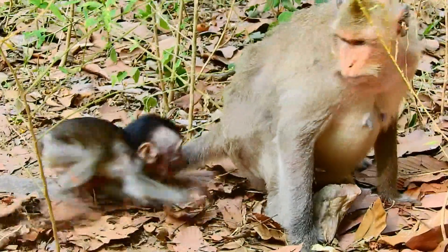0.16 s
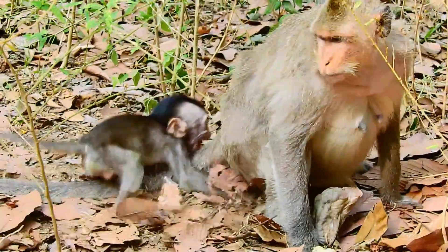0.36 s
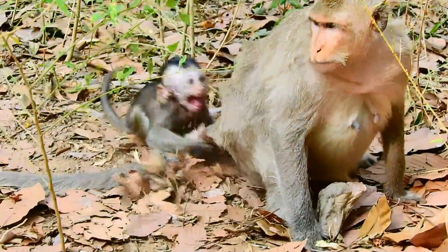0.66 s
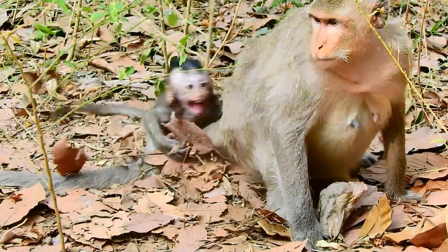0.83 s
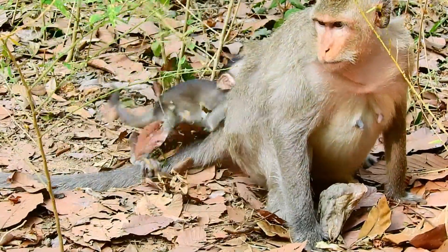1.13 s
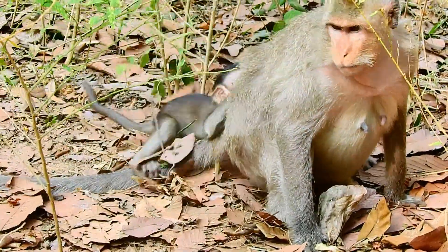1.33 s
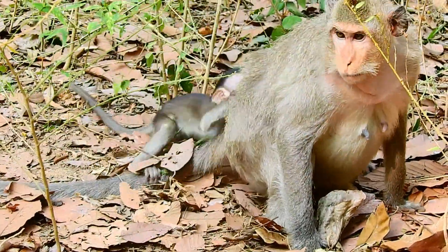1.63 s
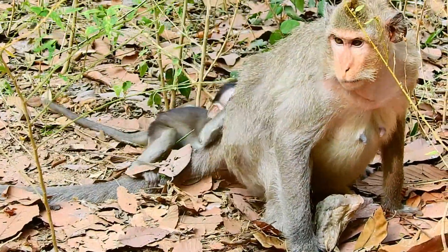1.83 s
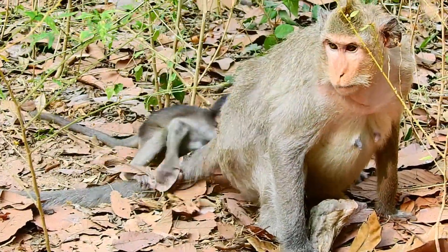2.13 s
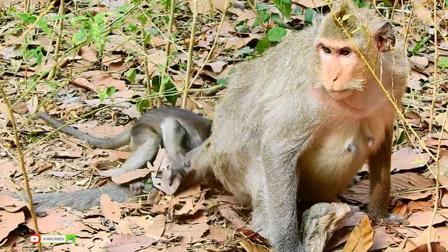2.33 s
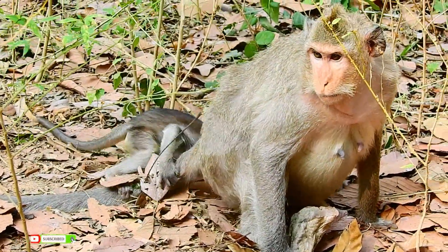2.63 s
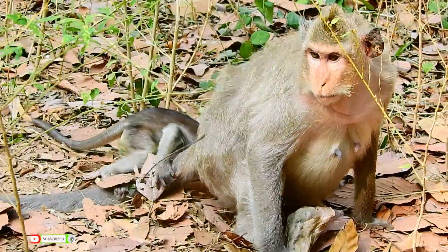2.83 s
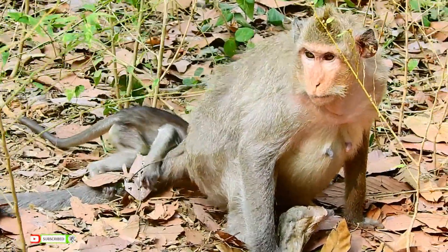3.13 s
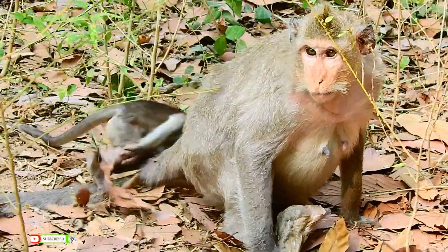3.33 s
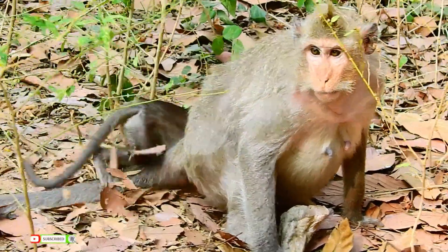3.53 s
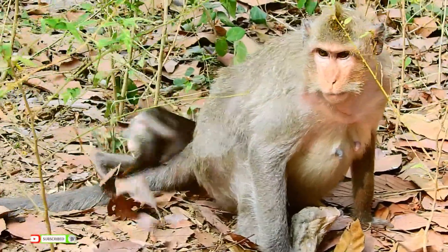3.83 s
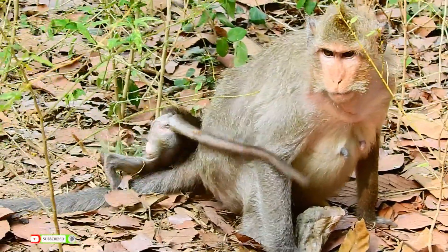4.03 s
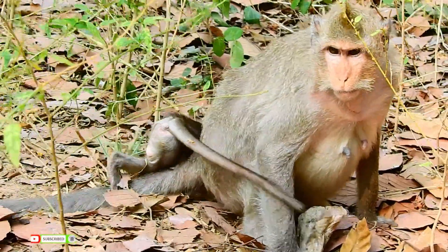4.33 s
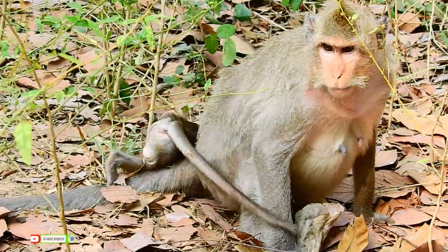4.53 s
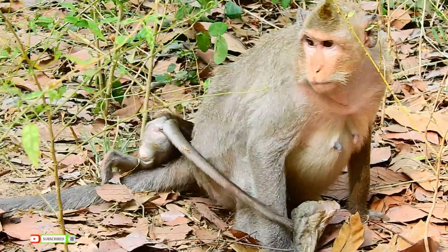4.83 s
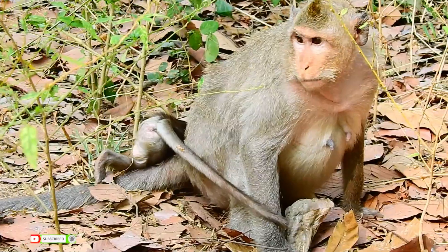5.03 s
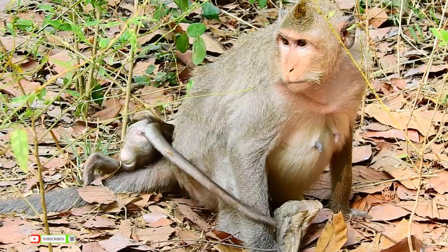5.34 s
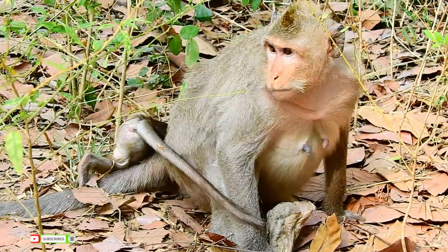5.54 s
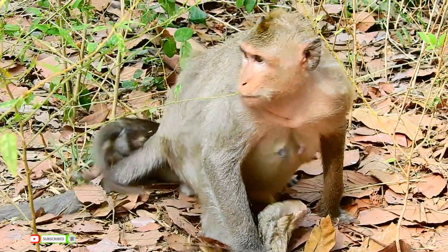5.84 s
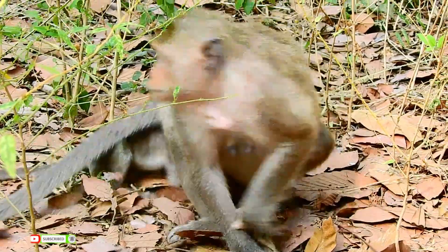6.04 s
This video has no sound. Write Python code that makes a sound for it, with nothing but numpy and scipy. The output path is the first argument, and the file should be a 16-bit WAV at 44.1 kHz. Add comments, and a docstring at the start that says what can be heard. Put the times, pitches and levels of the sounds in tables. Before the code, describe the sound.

Close outdoors on a dry forest floor, a baby monkey screams shrilly and hoarsely. Two long, forceful screams, rasping and cracking into squeals and choked sputters, are followed by a weaker one that sinks into a whimper, a tiny faint cry, then a short new yelp at the end. Leaves crackle and soft scuffs mark its steps. A far engine hums faintly under low rumble and light hiss, with a slight echo from the trees.

```python
"""Harsh screams of a baby monkey on a forest floor: chaotic vocal folds rasp and lock into clean squeals.
Hoarse glides thin the rasp; a squeezed throat chokes it, leaving a thin whistle and noisy sputters.
Delayed copies and a decaying noise tail give near bounces and a faint answer from the trees.
Around it: dry leaves crackle (sparse impulses), soft scuffs sound (grainy noise swells),
and a far engine hums and whines (wavering sines) in outdoor rumble and hiss (coloured noise)."""
import sys
import numpy as np
from scipy import signal
from scipy.fft import rfft, irfft, next_fast_len
from scipy.io import wavfile
from scipy.ndimage import uniform_filter1d, map_coordinates

SR = 44100
rng = np.random.default_rng(int(sys.argv[2]) if len(sys.argv) > 2 else 0)


def wav_record(signal):
    """Record a signal, one row per channel, as 16-bit PCM in the file named by sys.argv[1]."""
    frames = np.transpose(np.atleast_2d(signal))
    bounded = np.clip(frames, -1, 1)
    # unit amplitude maps onto the largest positive 16-bit level
    quanta = np.round(bounded * 32767).astype(np.int16)
    wavfile.write(sys.argv[1], SR, quanta)


N = 272317

# outdoor noise, relative spectrum: (frequency [Hz], density [dB per Hz])
AIR_SPECTRUM = [(12, -51), (20, -52), (35, -2), (129, -0.5), (156, -11), (263, -17.5), (494, -23),
                (832, -24), (1160, -28), (1360, -27), (2360, -33), (2780, -30.5), (4080, -31.5),
                (4550, -29), (14000, -81)]
# stereo width of that noise: (frequency [Hz], side re mid [dB])
AIR_WIDTH = [(60, -29), (130, -25.5), (300, -17.5), (1000, -9.5), (4000, -2)]
# far engine hum: (frequency [Hz], rms level before the swell [dB])
ENGINE_HUM = [(64, -59.5), (128, -59.5), (234, -71.5)]
# swell of the hum: (time [s], gain [dB])
HUM_SWELL = [(0, -7), (2.2, -5.5), (2.6, 4), (6.17, 2)]
# far whines: (time [s], length [s], from [Hz], to [Hz], from [dB], to [dB])
ENGINE_WHINES = [(2.97, 1.55, 1455, 1425, -67.5, -66), (4.56, 1.04, 1400, 1365, -63, -71.5),
                 (3.01, 0.336, 845, 855, -55, -69.5)]

# feet stir the leaves: (time [s], level [dB])
RUSTLES = [(.06, -53), (.37, -54.5), (.6, -53), (1.03, -60.5), (1.75, -62.5), (2.35, -70), (2.85, -62),
           (3.5, -69), (4.1, -68), (5.75, -60.5), (6.14, -51)]
RUSTLE_RISE_DB_PER_S, RUSTLE_FALL_DB_PER_S = 110, 31  # before and after each step
# leaf crackle, relative spectrum: (frequency [Hz], gain [dB])
LEAF_COLOUR = [(150, -13), (600, -6.5), (1800, -3.0), (3500, 4.0), (6000, -22.5), (9000, -25), (14000, -50)]
# dull scuffs: (time [s], length [s], rms level [dB], centre [Hz])
SCUFFS = [(0.049, 0.03, -53.5, 570), (.53, 0.061, -47, 142), (0.594, 0.022, -56, 1110),
          (0.777, 0.084, -54, 157), (1.02, 0.073, -56, 390), (1.079, .13, -53.5, 404),
          (1.128, 0.065, -49, 154), (1.136, 0.037, -60, 1330), (1.37, 0.11, -52.5, 149),
          (1.465, 0.022, -50.5, 425), (1.546, 0.098, -52.5, 390), (4.737, 0.061, -54.5, 519),
          (4.792, 0.037, -48, 621), (4.841, 0.2, -52.5, 567), (6.052, 0.12, -49.5, 321),
          (6.121, 0.01, -46.5, 1048)]
# scuff spectrum, relative: (multiple of the centre, gain [dB])
SCUFF_COLOUR = [(.2, -28), (.55, -2), (.85, 0), (1.15, 5), (1.6, -14.5), (4, -23.5), (12, -58)]

# decay among trunks and foliage: (frequency [Hz], t60 [s])
FOREST_DECAY = [(500, 0.28), (2500, 1.3), (4200, 1.18), (7000, 0.66), (12000, 0.43)]
# reflections off ground, mother and trunks: (delay [ms], gain [dB], direction [-1 left to 1 right])
BOUNCES = [(2.2, -22, .3), (3.8, -10.5, -0.29), (14.8, -16.5, 0.63)]
# the baby ducks behind its mother: (time [s], sound sent to the echoes re direct sound [dB])
HIDDEN = [(0, 1), (1.1, -1.5), (2.05, 0), (3.0, -3), (3.6, 3), (4.4, 8), (5.05, 6.5), (5.9, 5.5)]

# vocal fold spectrum: (multiple of the fundamental, amplitude [dB])
FOLD_HARMONICS = [(1, 0.5), (2, 2.5), (3, -6), (4, -4), (5, 0.5), (6, -3.5)]
# mouth and throat response, relative: (frequency [Hz], gain [dB])
THROAT = [(600, -46), (1500, -44), (2400, -24.5), (2800, -6), (3200, 5.5), (4300, 5), (5000, 6), (5800, -3),
          (7800, -12.5), (9200, -21), (10500, -23), (11600, -34.5), (14000, -44)]

# one curve per scream: (time [s], second harmonic [Hz], effort as level before choking [dB])
SCREAMS = [
    [(0.0, 4286, -32.5), (0.095, 4110, -39.5), (0.206, 4650, -34), (0.291, 4292, -38), (0.462, 4568, -32),
     (0.652, 4627, -42), (0.703, 4643, -35.0), (0.808, 4560, -36.5), (0.959, 4480, -34.0),
     (1.099, 4804, -40.5), (1.2, 4170, -54.0), (1.31, 4446, -52), (1.33, 4110, -56)],
    [(1.645, 3860, -45), (1.705, 4713, -40.5), (1.977, 4460, -30.5), (2.072, 3790, -31),
     (2.137, 3974, -29.5), (2.213, 4675, -39.0), (2.313, 4120, -45), (2.328, 4475, -40.5),
     (2.695, 4320, -32.5), (2.846, 4280, -35), (2.962, 4270, -46.0), (3.027, 3800, -37), (3.042, 3500, -56)],
    [(3.356, 3670, -48.5), (3.396, 3824, -36), (3.462, 4413, -42), (3.563, 4360, -39), (3.669, 4330, -44),
     (4.047, 4363, -38.5), (4.057, 4360, -50), (4.243, 4138, -47.0), (4.435, 3838, -37), (4.48, 3840, -72)],
    [(4.9, 4266, -56.5), (4.975, 4344, -45.5), (5.04, 4835, -53)],
    [(5.845, 4144, -52.5), (5.912, 4420, -34), (6.065, 4325, -48), (6.096, 4220, -57), (6.168, 4350, -41)],
]
# one row per scream: (base relative pitch scatter, overtone ceiling at its start [dB], at its end [dB])
MANNER = [(.17, -49, -45), (.17, -52, -53.5), (.135, -56, -62), (.16, -64, -68.5), (0.16, -51, -52)]
CALMING, CALM_S = 0.395, 0.0812  # share of scatter lost next to a squeal; time constant of its return
SLACKNESS = 1.299  # power by which scatter grows as pitch falls
STRAND_DB, STRAND_RATIO = -8, 1.04  # half-locked tone: base level; pitch re the rasp
STUTTER_DB, STUTTER_KNOTS_PER_S = 1.5, 150  # random level swing of the leaking rasp in a tight throat
OVERTONE_DB = -10.5  # treble re level in a weak voice

# clean squeals: (time [s], length [s], from [Hz], to [Hz], from [dB], to [dB])
SQUEALS = [(.104, 0.058, 4536, 4740, -26, -38.5), (0.794, 0.024, 5230, 5020, -36.5, -36),
           (1.094, 0.075, 4884, 4820, -38.5, -47), (1.755, 0.021, 4960, 4700, -35.5, -30),
           (1.887, .025, 4693, 4450, -26.5, -29), (1.984, .093, 3876, 3196, -31.5, -28),
           (2.188, 0.022, 4740, 4720, -32, -36), (2.663, .119, 4470, 4020, -29, -33),
           (3.534, 0.014, 4330, 4300, -36.5, -31), (3.817, 0.03, 4380, 4220, -33, -36),
           (3.891, 0.021, 4080, 4170, -33.5, -35), (3.954, .033, 4172, 4280, -32, -37.5),
           (4.104, 0.019, 4307, 4230, -34.5, -45.5)]
SQUEAL_BEND, SQUEAL_OVERTONE_DB = -2, -3.5  # glide quick at first, then settling; treble change in a squeal

# hoarse glides, mostly opening and closing the screams:
# (time [s], length [s], from [Hz], to [Hz], from [dB], to [dB], bend, fundamental re second harmonic [dB])
WHIMPERS = [(1.21, .12, 4950, 4420, -53, -50, 4, -12), (1.632, .048, 3598, 4650, -51.5, -50, -.8, -13),
            (1.968, 0.023, 4100, 3800, -36, -39, -.5, -22), (2.08, .1, 3250, 4383, -32.5, -43, 1.86, -28),
            (2.99, 0.053, 3990, 2800, -46, -41.5, 1.8, -21),
            (3.354, 0.13, 2990, 4650, -47.5, -41, -0.7, -35),
            (4.22, .24, 3840, 3080, -48.5, -42.5, 1.7, -27),
            (4.925, 0.0555, 3600, 3372, -55, -50, 0.9, -28), (4.985, .07, 5540, 4400, -47, -54, 1, -1.5),
            (5.06, 0.057, 4000, 1900, -66, -62.5, -0.9, 4),
            (5.845, 0.099, 2618, 4200, -53.5, -38.5, 3.5, -19), (5.95, .07, 4647, 4570, -46, -50, 1, -28)]
WHIMPER_SHARE = 0.14  # part of the rasp that gives way

# throat whistles: (time [s], length [s], from [Hz], to [Hz], from [dB], to [dB],
# relative pitch scatter, choking of the rasp [dB, negative lifts it])
WHISTLES = [(0, 0.093, 9220, 10800, -52.5, -62, .022, 2), (.19, .135, 6940, 10600, -55, -57, 0.044, 0),
            (.33, 0.029, 10910, 10800, -50, -50, 0.0063, 17),
            (.368, 0.02, 11140, 11350, -47, -50, .004, 16), (.73, .37, 8120, 7850, -50.5, -52.5, 0.0306, 0),
            (1.11, 0.18, 7560, 7450, -63, -52.5, .004, 0), (1.337, 0.00898, 7525, 5874, -52, -58, .003, -3),
            (2.21, 0.12, 7440, 9600, -52, -53, .07, 0), (2.327, .157, 9860, 9694, -51.5, -53, 0.026, 5),
            (2.487, 0.16, 8600, 9200, -77, -57, .016, 16),
            (2.893, 0.079, 8480, 8050, -66, -48.5, 0.01035, 18),
            (5.87, 0.14, 6550, 8400, -51, -65.5, .035, 0.5), (6.04, 0.029, 8440, 8390, -56, -64, 0.0044, 0),
            (6.095, 0.05, 8820, 9340, -55.5, -60, 0.0037, 4.5)]
WHISTLE_BEND, UNDERTONE_DB = -.5, 2  # glide curve; lower octave re whistle in a tight throat
WHISTLE_FLUTTER_DB, WHISTLE_FLUTTER_KNOTS_PER_S = 3, 260  # random level swing
TIGHT_DB = 0.5  # choking at which the throat counts as fully tight
# strong sputters through the closed throat: (time [s], length [s], level [dB])
SPUTTERS = [(.003, 0.0067, -29), (.012, 0.0018, -22.5), (.03, .008, -33), (0.054, 0.0061, -28.5),
            (0.084, 0.0036, -35), (0.328, 0.0027, -30), (0.36, 0.014, -43), (.387, 0.0084, -37),
            (2.34, .003, -31), (2.362, 0.003, -33), (2.374, 0.0021, -28.5), (2.402, 0.0026, -29.5),
            (2.43, 0.002, -30), (2.447, 0.0017, -26), (2.468, .004, -29.5), (2.501, 0.0072, -27.5),
            (2.512, .011, -32), (2.528, .008, -34.5), (2.544, 0.03, -33.5), (2.578, 0.014, -30.5),
            (2.644, .02, -33.5), (2.725, .005, -30), (2.737, 0.0054, -31), (2.912, 0.0077, -37.5),
            (2.942, .008, -41.5), (2.969, 0.0049, -40), (5.795, .002, -46.5), (6.132, 0.01, -33)]

TOP_HZ = 14200  # upper band limit


def amp(db):
    """Decibels to gain."""
    return 10 ** (np.asarray(db) / 20)


def unit(x):
    """Scale to rms 1."""
    return x / np.sqrt(np.mean(x ** 2) + 1e-20)


def along(points, hz):
    """Interpolate (Hz, value) points on a log-frequency axis."""
    point_hz, values = np.transpose(points)
    return np.interp(np.log(hz + 1e-9), np.log(point_hz), values)


def curves(rows):
    """One value per sample for each column after the time."""
    s, *columns = np.transpose(rows)
    return [np.interp(np.arange(N) / SR, s, column) for column in columns]


def gate(start_s, end_s, edge_s):
    """1 between two times, with soft edges."""
    t = np.arange(N) / SR
    return np.clip(np.minimum(t - start_s, end_s - t) / edge_s + .5, 0, 1)


def wobble(knots_per_s):
    """Smooth random curve through normally distributed knots."""
    knots = rng.standard_normal(int(N * knots_per_s / SR) + 4)
    return map_coordinates(knots, [np.arange(N) * knots_per_s / SR])


def filtered(x, response):
    """Apply a zero-phase response, given as a function of Hz."""
    m = next_fast_len(N + 8192)
    return irfft(rfft(x, m) * response(np.fft.rfftfreq(m, 1 / SR)), m)[..., :N]


def phase(hz):
    """Running phase of a pitch curve."""
    return 2 * np.pi * np.cumsum(hz) / SR


def steady(x, size=441):
    """Hold the short-term rms at 1; size in samples."""
    return x / np.sqrt(np.abs(uniform_filter1d(x * x, size)) + 1e-12)


def glides(rows, edge_s, bend=None):
    t = np.arange(N) / SR
    rows = np.array(rows, float)
    current = np.maximum(np.searchsorted(rows[:, 0] - edge_s / 2, t) - 1, 0)
    s, length_s, from_hz, to_hz, from_db, to_db, *more = rows[current].T
    bend = more.pop(0) if bend is None else bend
    progress = np.clip((t - s) / length_s, 0, 1)
    hz = from_hz + (to_hz - from_hz) * np.expm1(bend * progress) / np.expm1(bend)
    db = from_db + (to_db - from_db) * progress
    return [gate(s, s + length_s, edge_s), hz, db] + more


def outdoor_air():
    """Rumble and hiss: coloured mid and side noise, narrow in the bass."""
    def response(hz):
        return amp(along(AIR_SPECTRUM, hz)) * np.array([np.ones_like(hz), amp(along(AIR_WIDTH, hz))])

    mid, side = filtered(rng.standard_normal((2, N)), response)
    return amp(-49.5 + 0.29 * wobble(7.1)) * unit(np.array([mid + side, mid - side]))


def far_engine():
    """Low hum and gliding whines: sines wavering in pitch and level."""
    hum = 0
    for hz, db in ENGINE_HUM:
        level = amp(db + 1.9 * wobble(5.5)) * np.sqrt(2)
        hum = hum + level * np.sin(phase(hz * (1 + 0.01178 * wobble(12))))
    engine = hum * amp(curves(HUM_SWELL)[0])
    for row in ENGINE_WHINES:
        on, hz, db = glides([row], edge_s=0.017, bend=-1.01)
        engine = engine + on * amp(db + 4.0 * wobble(25)) * np.sin(phase(hz * (1 + 0.014 * wobble(120))))
    return engine


def leaves():
    """Dry leaves snap in random clumps, swelling at each step and settling after it."""
    t = np.arange(N) / SR
    step_levels_db = [db - np.maximum(RUSTLE_RISE_DB_PER_S * (s - t), RUSTLE_FALL_DB_PER_S * (t - s))
                      for s, db in RUSTLES]
    level_db = np.max(step_levels_db, axis=0)
    impulses = rng.standard_normal(N) * (rng.random(N) < 700 / SR)  # about 700 a second
    snaps = impulses * amp(3.5 * wobble(16))
    return amp(level_db) * unit(filtered(snaps, lambda hz: amp(along(LEAF_COLOUR, hz))))


def scuffs():
    """Soft rubs and bumps: grainy noise swells, each around its own centre frequency."""
    out = np.zeros(N + SR)
    for s, length_s, db, centre_hz in SCUFFS:
        n = int(length_s * SR) + 2
        grains = rng.standard_normal(8192) * (rng.random(8192) < .03)
        colour = amp(along(SCUFF_COLOUR, np.fft.rfftfreq(8192, 1 / SR) / centre_hz))
        rub = irfft(rfft(grains) * colour)
        swell = np.resize(rub, n) * signal.windows.tukey(n, .6)
        out[round(s * SR):][:n] += amp(db) * unit(swell)
    return out[:N]


def forest(x, width):
    """Trunks and foliage scatter a diffuse tail: noise decaying at its own rate in each band."""
    hz, t, z = signal.stft(rng.standard_normal((2, SR)), SR, nperseg=256)
    decay = amp(-60 * t / along(FOREST_DECAY, hz)[:, None])
    tail = signal.istft(z * decay, SR, nperseg=256)[1]
    tail = tail / np.linalg.norm(tail[0])
    delayed = np.pad(x, (300, 0))[None]  # samples before the tail starts
    mid, side = signal.fftconvolve(delayed, tail, axes=1)[:, :N]
    return np.array([mid + width * side, mid - width * side])


def bounces(x):
    """Near reflections comb the sound; their paths shift as the baby moves."""
    now = np.arange(N)
    drift_ms = 0.092 * wobble(1.946)
    out = 0
    for delay_ms, db, side in BOUNCES:
        echo = np.interp(now - (delay_ms + drift_ms) * SR / 1000, now, x)
        out = out + amp(db) * np.outer([1 - side, 1 + side], echo)
    return out


def manner():
    """Base scatter and overtone ceiling through each scream."""
    points = []
    for rows, (scatter, first_db, last_db) in zip(SCREAMS, MANNER):
        points += [(rows[0][0], scatter, first_db), (rows[-1][0], scatter, last_db)]
    return curves(points)


def overtones(db):
    """Treble re level: constant in a weak voice; saturation makes loud passages rounder."""
    ceiling_db = manner()[1]
    return -20 * np.log10(np.hypot(amp(-OVERTONE_DB), amp(db - ceiling_db)))


def unrest(hz):
    """Fold scatter: greater when slack, smaller near a squeal."""
    t = np.arange(N) / SR
    gaps_s = [np.maximum(np.abs(t - s - length_s / 2) - length_s / 2, 0) for s, length_s, *_ in SQUEALS]
    away_s = np.min(gaps_s, axis=0)
    return manner()[0] * (1 - CALMING * np.exp(-away_s / CALM_S)) * (4400 / hz) ** SLACKNESS


def folds(second_hz, scatter, air_db):
    """Taut folds: harmonics with pitch dropping from a ceiling and scattering quickly, plus turbulence."""
    drops = .8 - np.minimum(wobble(600) ** 2, 3)
    jitter = scatter * (.55 * drops + .55 * wobble(2400))
    turn = phase(second_hz / 2 * (1 + jitter))
    tone = sum(amp(db) * np.sin(k * turn) for k, db in FOLD_HARMONICS)
    return tone + amp(air_db) * rng.standard_normal(N)


def mouth(source, pitch_hz, db, treble_db):
    """Throat resonances rise with pitch; body and overtones get separate levels."""
    shifts = [.8, 1, 1.1]
    shift = (pitch_hz / 4400) ** .5
    voice = 0
    for s, share in zip(shifts, np.eye(3)):  # crossfade three fixed throats
        shaped = filtered(source, lambda hz: amp(along(THROAT, hz / s)))
        voice = voice + np.interp(shift, shifts, share) * shaped
    body = filtered(voice, lambda hz: 1 / (1 + (hz / 6000) ** 24))
    return amp(db) * (steady(body) + amp(treble_db) * steady(voice - body))


def whimpers(on, hz, db, fundamental_db):
    """Low effort gives a hoarse glide, and the fundamental can come through."""
    turn = phase(hz / 2 * (1 + .009 * wobble(200) + .03 * wobble(2000)))
    upper = amp(overtones(db) + 1) * (np.sin(3 * turn) + .5 * np.sin(4 * turn))
    tone = amp(fundamental_db) * np.sin(turn) + np.sin(2 * turn) + upper
    return on * amp(db + 2.2 * wobble(200)) * tone


def throat_whistle(on, hz, db, strain, tight):
    """A narrowed throat whistles very high; strain scatters the pitch and tightness adds a lower octave."""
    turn = phase(hz * (1 + .006 * wobble(90) + strain * wobble(1000)))
    level = amp(db + WHISTLE_FLUTTER_DB * wobble(WHISTLE_FLUTTER_KNOTS_PER_S))
    return on * level * (np.sin(turn) + tight * amp(UNDERTONE_DB) * np.sin(turn / 2))


def sputters():
    """Short bursts of scattered fold sound escape the closed throat."""
    bursts = sum(amp(db) * gate(s, s + length_s, edge_s=0.0013) for s, length_s, db in SPUTTERS)
    source = folds(second_hz=4390, scatter=0.1, air_db=-23)
    voice = filtered(source, lambda hz: amp(along(THROAT, hz)))
    return bursts * steady(voice, size=66)


def squeals(on, hz, db):
    """The folds lock into a clean, slightly trembling tone."""
    source = folds(hz * (1 + .0065 * wobble(100)), scatter=0.00808, air_db=-17)
    return on * mouth(source, hz, db + 1.3 * wobble(130), overtones(db) + SQUEAL_OVERTONE_DB)


def rasp(share, choke_db, tight):
    """Chaotic folds stall and restart every few milliseconds, tearing the tone into packets."""
    on = share * sum(gate(rows[0][0], rows[-1][0], edge_s=.004) for rows in SCREAMS)
    hz, db = curves(np.vstack(SCREAMS))
    chaos = np.maximum(unrest(hz), .03) * amp(2 * wobble(50))
    lock = 1.24 * (0.097 / chaos) ** 2.06  # calmer folds keep their phase for longer
    packets = np.tanh(1.8 * wobble(800) + lock)
    source = folds(hz * (1 + .025 * wobble(55)), scatter=.85 * chaos, air_db=-10)
    strand_level = np.sqrt(lock) * amp(STRAND_DB + 3.3 * wobble(35))  # stronger when calm
    strand = strand_level * np.sin(phase(STRAND_RATIO * hz * (1 + 0.022 * wobble(70))))
    stutter_db = tight * STUTTER_DB * wobble(STUTTER_KNOTS_PER_S)
    level_db = db - choke_db + stutter_db + 0.85 * wobble(70)
    return on * mouth(source * packets + strand, hz, level_db, overtones(db) - 6 * tight)


def baby():
    """One voice: squeals replace the rasp, hoarse glides thin it, a squeezed throat chokes it."""
    squeal = glides(SQUEALS, edge_s=0.0038, bend=SQUEAL_BEND)
    whimper = glides(WHIMPERS, edge_s=.008)
    *whistle, choke_db = glides(WHISTLES, edge_s=0.00415, bend=WHISTLE_BEND)
    choke_db = whistle[0] * choke_db
    tight = np.clip(choke_db / TIGHT_DB, 0, 1)
    rasp_share = (1 - squeal[0]) * (1 - WHIMPER_SHARE * whimper[0])
    squeezed = throat_whistle(*whistle, tight) + sputters()
    return rasp(rasp_share, choke_db, tight) + squeals(*squeal) + squeezed + whimpers(*whimper)


def scene():
    """Monkey and ground a little right, background a little right; hiding turns more of the cry to echo."""
    background = (outdoor_air() + far_engine()) * amp([[-.35], [.35]])
    ground = scuffs() + leaves()
    hidden = amp(curves(HIDDEN)[0])
    cry = baby() / np.hypot(1, amp(-6.5) * hidden)
    outward = cry * hidden
    near = cry + bounces(outward) + ground
    echo = amp(-13.5) * forest(outward + ground, width=0.61)
    return (near + echo) * amp([[-.6], [.6]]) + background


def record(dry):
    """Brick-wall low-pass at the upper band limit."""
    return filtered(dry, lambda hz: hz < TOP_HZ)


dry = scene()
out = record(dry)
wav_record(out)
```